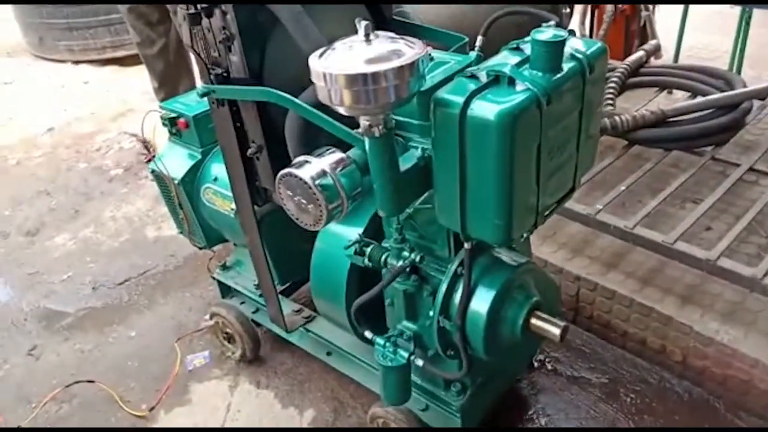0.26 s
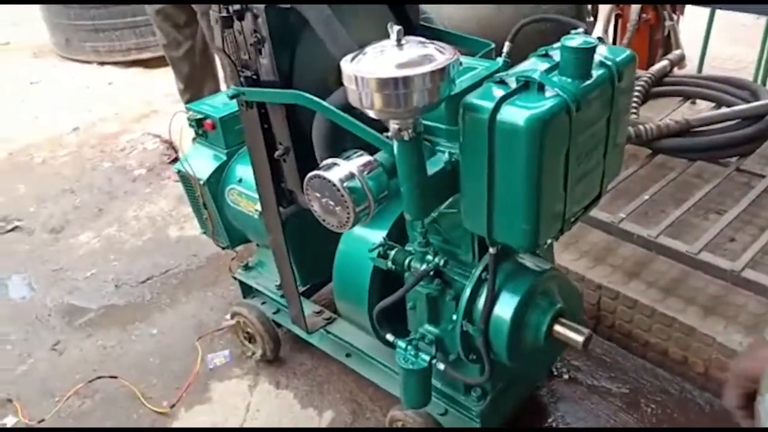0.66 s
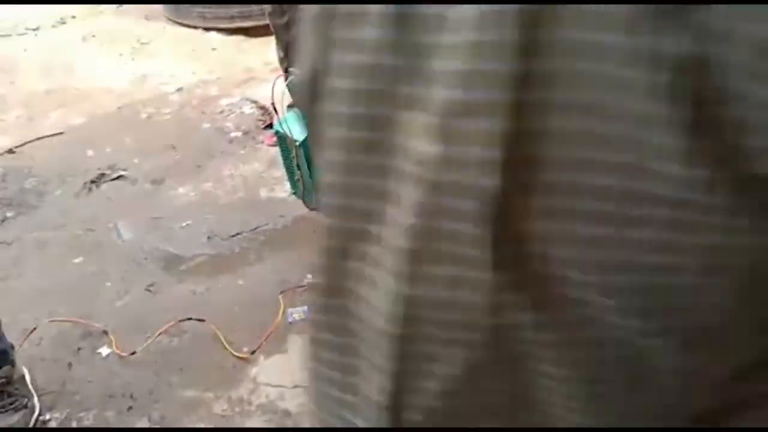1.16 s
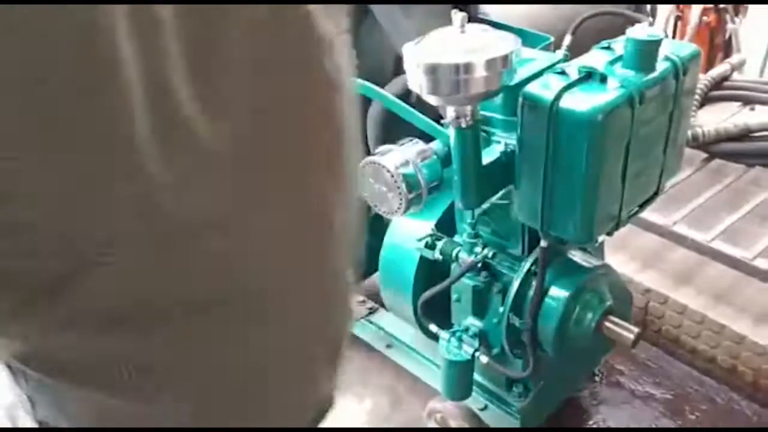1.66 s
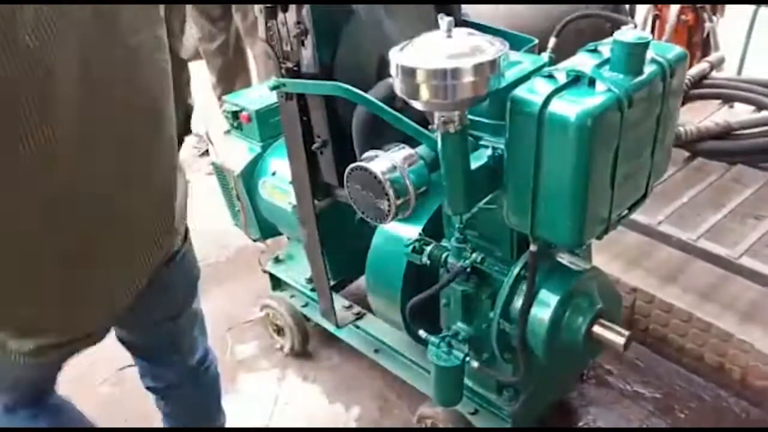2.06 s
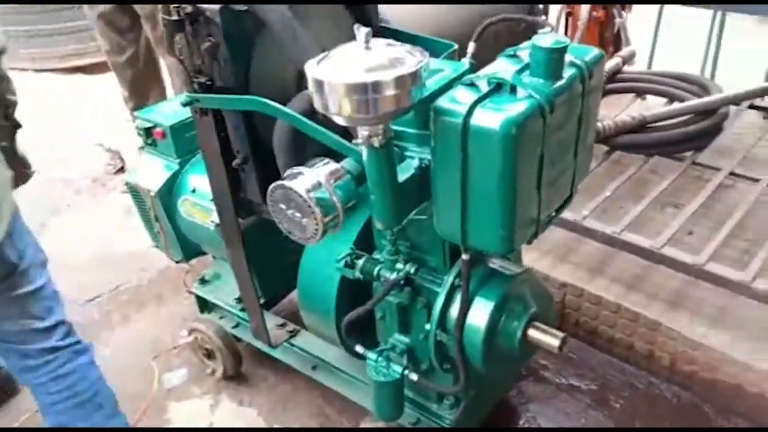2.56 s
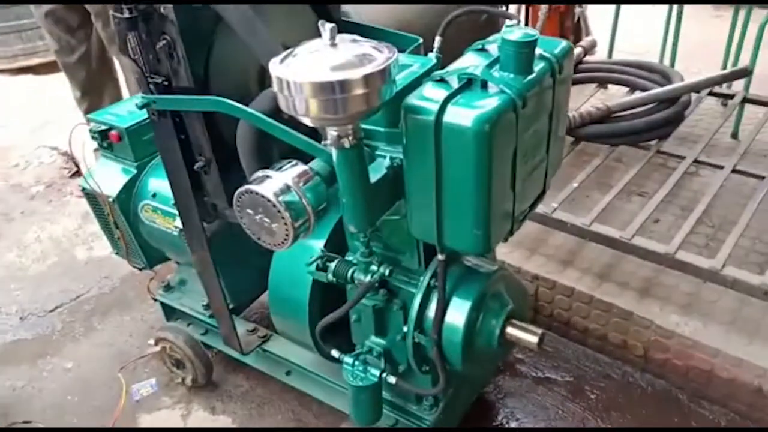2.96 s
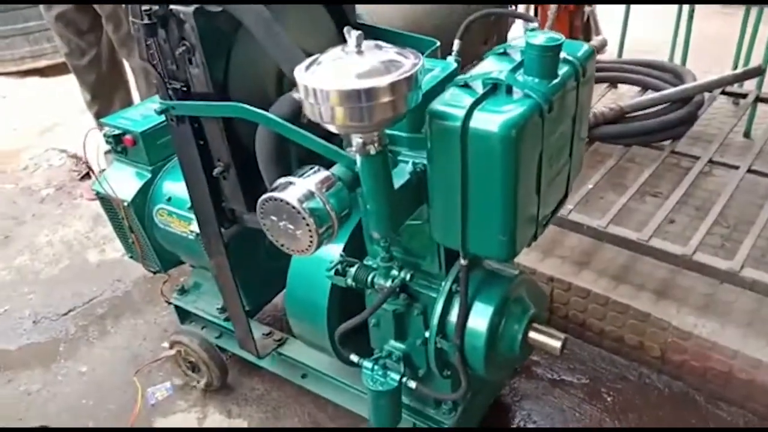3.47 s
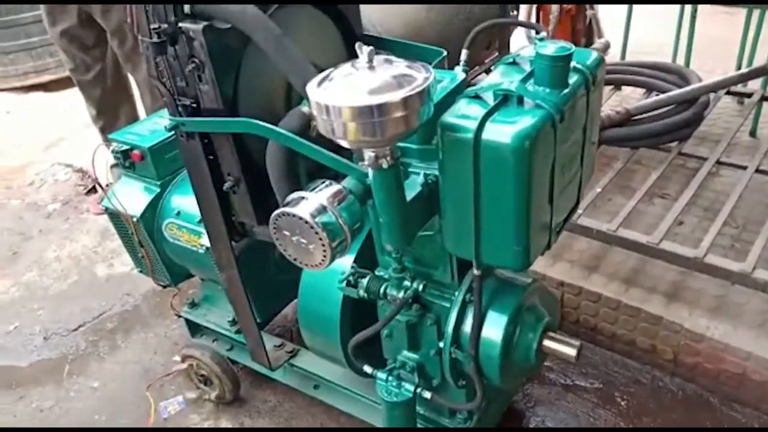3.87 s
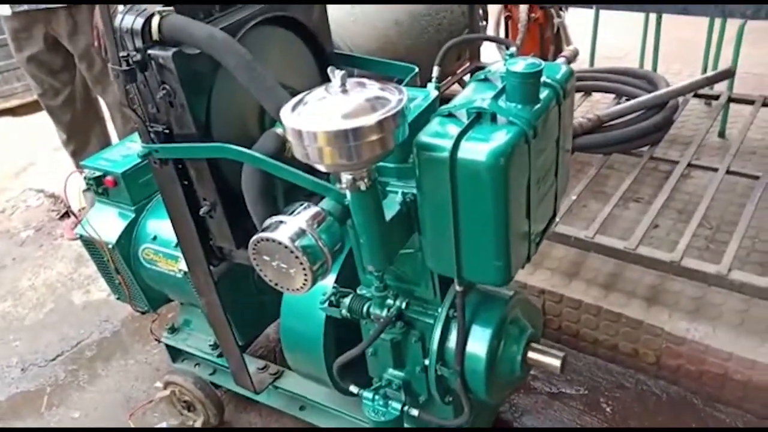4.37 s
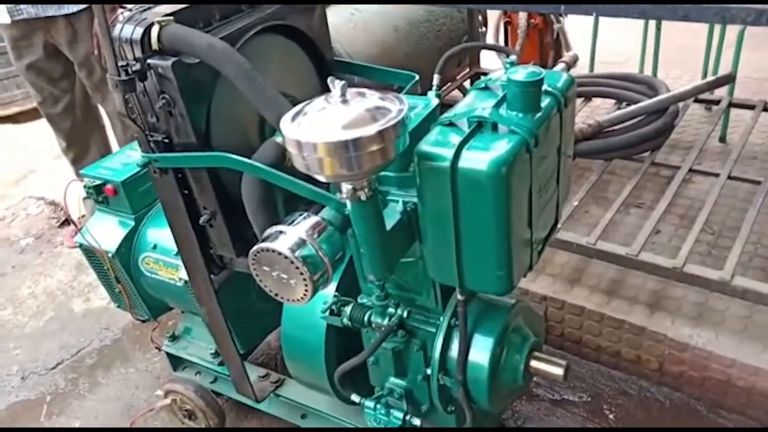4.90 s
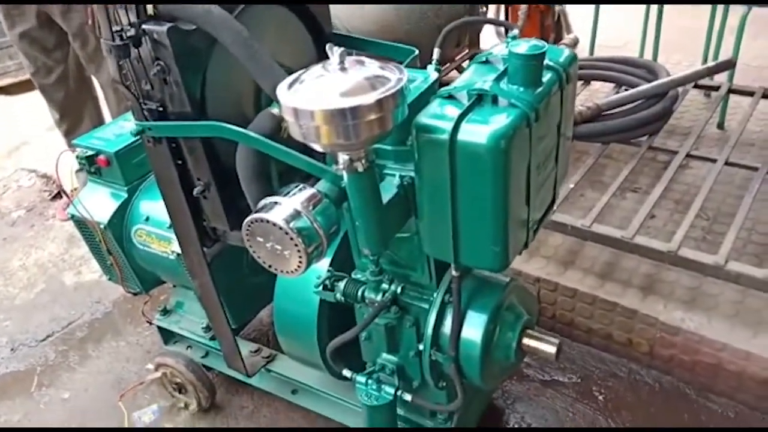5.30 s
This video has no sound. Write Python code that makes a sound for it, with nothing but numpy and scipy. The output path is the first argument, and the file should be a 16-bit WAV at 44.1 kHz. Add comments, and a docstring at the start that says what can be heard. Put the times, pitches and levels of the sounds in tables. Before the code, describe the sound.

Already running, a nearby diesel generator thuds and knocks about twelve times a second, with hissing exhaust blasts, a deep chug and rattling gears and tappets. After about half a second a passing body shields the microphone and softens the treble, most strongly just past one second. The full, bright clatter returns around two and a half seconds and carries on steadily, with brief reflections from an outdoor workshop yard.

```python
"""A single-cylinder four-stroke diesel turns a generator at about 1500 rpm in a workshop yard.
Each cycle, combustion knocks the block into resonance, the exhaust releases a turbulent blast,
and a deep gulp sets the air cleaner ringing; gears, tappets and bearings chatter throughout.
The governor hunts a little: the knock follows the fuel, the gulp follows the speed.
A man walking between engine and microphone shadows the treble; the yard returns a short tail."""
import sys
import numpy as np
from scipy import signal
from scipy.fft import rfft, irfft
from scipy.io import wavfile
from scipy.ndimage import uniform_filter1d, minimum_filter1d, map_coordinates

SR = 44100
rng = np.random.default_rng(int(sys.argv[2]) if len(sys.argv) > 2 else 0)


def dump(signal):
    """Clip the signal to [-1, 1] and save it as 16-bit WAV at the path in sys.argv[1]."""
    limited = np.clip(np.atleast_2d(signal).T, -1, 1)
    pcm = np.round(limited * 32767).astype(np.int16)
    wavfile.write(sys.argv[1], SR, pcm)


N = 244314

# Engine speed as the governor hunts, then settles: (time [s], firing rate [Hz])
FIRING_RATE = [(0.0, 12.359), (0.43, 12.831), (0.88, 12.521), (1.34, 12.876), (1.99, 13.04), (2.55, 12.406),
               (2.95, 12.29), (3.39, 12.718), (3.91, 12.421), (4.96, 12.533), (5.54, 12.497)]
# Piston slap and bearing knocks after ignition: (delay [s], level [dB])
IMPACTS = [(.0015, 1.5), (.005, -6), (.0084, -4.5)]
# Modes of block, flywheel and tank: (frequency [Hz], bandwidth [Hz], level over the spectrum [dB])
BLOCK_MODES = [(626, 100, 7), (858, 110, 6.5), (1028, 90, 5), (1624, 120, 4), (1792, 110, 2.5),
               (1954, 100, 4), (2116, 80, 3), (2250, 70, 11)]
# Broad response of the block: (frequency [Hz], level [dB])
BLOCK_SPECTRUM = [(60, -30.5), (150, -14.5), (240, -6), (330, -15), (520, -8.5), (750, -4), (1300, -9),
                  (1600, -2.5), (2300, -0.5), (2700, -10), (4000, -17.5), (5500, -41.5), (8500, -39.5),
                  (15000, -53)]
# Exhaust turbulence, as mid roar, high hiss and low buffet: (frequency [Hz], level [dB])
ROAR_SPECTRUM = [(40, -53.5), (110, 1), (300, 0.5), (750, 0.5), (1300, -1), (2200, 1), (2800, -1.5),
                 (3900, -3.5), (5000, -14.5), (6200, -29), (9000, -46)]
HISS_SPECTRUM = [(2000, -21), (5000, -1.5), (6400, -6), (7500, -3), (8900, 3), (10500, -7), (12200, 1),
                 (13000, -4.5), (14000, 2.5), (15600, 0)]
BUFFET_SPECTRUM = [(25, -49), (60, -9.5), (130, 0), (220, -5), (400, -3.5), (900, -36.5)]
# Exhaust blasts that roar harder or softer than the rest: (time [s], level change [dB])
BLAST_ACCENTS = [(.13, -0.5), (.37, 1.5), (2.89, 2.5), (2.97, 0.5)]
# Modes of air cleaner and frame: (frequency [Hz], level [dB], 60 dB decay time [s])
INTAKE_MODES = [(76.3, -24, 0.87), (162.4, -0.5, 0.38), (187.2, 5.5, 0.19), (215.6, 19, 0.039),
                (280.2, 4, 0.13), (357.2, -1, 0.13), (412.4, 7.5, 0.059), (524, -44, 0.042),
                (632.3, -1.5, 0.15), (797, 4.5, 0.075)]
# Chatter of gears, tappets and bearings: (frequency [Hz], level [dB])
CLATTER_SPECTRUM = [(25, -6), (60, 3), (200, -20), (400, 8.5), (550, -2.5), (780, -11), (1050, 3),
                    (2200, 9), (3000, 2), (4100, 2.5), (5500, -20.5), (8000, -13), (10500, -37),
                    (15000, -26)]
# Legs crossing before the microphone: (time [s], half duration [s], share of the full shadow [0-1])
LEG_CROSSINGS = [(1.087, .1, 1), (1.407, 0.205, 0.62)]
# Reverberation of the yard: (frequency [Hz], 60 dB decay time [s])
YARD_DECAY = [(100, 0.52), (500, 0.86), (2000, 0.55), (5000, 0.24), (15000, 0.28)]

FIRE_PHASE, EXHAUST_PHASE, INTAKE_PHASE = .372, .608, .914  # fractions of a cycle
LEAD = SR // 4  # the engine is already running at time zero
T = np.arange(-LEAD, N) / SR
FIRING_HZ = np.interp(T, *np.transpose(FIRING_RATE))
CYCLES = (np.cumsum(FIRING_HZ) - LEAD * FIRING_RATE[0][1]) / SR


def knock(db=-18, decay_s=.0035, tail_db=-13, tail_s=.02, ring_db=-26, ring_hz=850, ring_width_hz=75):
    """Impact excitation: each ignition hammers the modes of the block, harder with more fuel."""
    t = np.arange(2048) / SR
    envelope = sum(amp(level) * np.exp(-np.maximum(t - delay, 0) / decay_s)
                   * np.clip(t / delay, 0, 1) ** 3 for delay, level in IMPACTS)
    envelope += amp(tail_db) * np.exp(-t / tail_s)
    firings = strokes(FIRE_PHASE, jitter_s=.0004, spread_db=1)
    # the contact pattern changes slowly as the microphone moves, and partly anew at every firing
    angle = np.pi * (.3 * T + rng.random())
    pattern = sum(weight * unit_rms(convolve(firings, rattle(envelope)))
                  for weight in (1, np.cos(angle), np.sin(angle)))
    blows = unit_rms(pattern) + .6 * unit_rms(convolve(firings, envelope) * noise())
    block = amp(db) * colour(blows, BLOCK_SPECTRUM, BLOCK_MODES) * governor(speed_db=0, fuel_db=.5)
    low = signal.sosfiltfilt(signal.butter(4, 1350, fs=SR, output="sos"), block)
    shadow = shade(near_db=-4, leg_db=-3.5)
    shaded = low * shadow ** .51 + (block - low) * shadow  # long waves bend round the man
    # one mode of the block stands out while he is in front
    resonator = signal.iirpeak(ring_hz, ring_hz / ring_width_hz, SR)
    ring = unit_rms(signal.lfilter(*resonator, signal.lfilter(*resonator, blows)))
    return shaded + amp(ring_db) * ring * bump(at_s=1.23, half_s=.38)


def rattle(envelope):
    """Brief impacts are broadband: random contacts under an envelope, with a flattened spectrum."""
    burst = rng.standard_normal(len(envelope)) * envelope
    for _ in range(3):
        spectrum = rfft(burst)
        band_rms = np.sqrt(uniform_filter1d(abs(spectrum) ** 2, size=11))
        burst = irfft(spectrum / band_rms, len(envelope))
        local_rms = np.sqrt(abs(uniform_filter1d(burst ** 2, size=45)) + 1e-12)
        burst = np.tanh(burst / local_rms) * envelope
    return burst


def exhaust(roar_db=-22, hiss_db=-33.5, buffet_db=-33, pulse_db=-14):
    """Blowdown: gas escaping through the valve radiates a pressure pulse and turbulent noise."""
    roar = amp(roar_db) * jet(ROAR_SPECTRUM, decay_s=.014, spread_db=.1)
    roar *= shade(near_db=-2.5, leg_db=-6.5) * governor(speed_db=-3, fuel_db=.8)
    roar *= amp(sum(change_db * bump(at_s, half_s=.04) for at_s, change_db in BLAST_ACCENTS))
    hiss = amp(hiss_db) * jet(HISS_SPECTRUM, decay_s=.032, spread_db=.45)
    hiss *= shade(near_db=-1.85, leg_db=-5)
    buffet = amp(buffet_db) * jet(BUFFET_SPECTRUM, decay_s=.0027, spread_db=4.5)
    buffet *= shade(near_db=-19.5, leg_db=-12)
    pulse = -amp(pulse_db) * pressure_pulse(strokes(EXHAUST_PHASE, spread_db=.1), hz=240, half_s=.0015)
    return diffract(roar + hiss) + buffet + pulse


def jet(spectrum, decay_s, spread_db, rise_s=.0015, open_s=.026, close_s=.002):
    """Turbulence: noise starts as the exhaust valve opens and decays until the valve cuts it off."""
    t = np.arange(SR // 16) / SR
    valve = np.clip(t / rise_s, 0, 1) / (1 + np.exp((t - open_s) / close_s))
    flow = convolve(strokes(EXHAUST_PHASE, spread_db=spread_db), valve * np.exp(-t / decay_s))
    return colour(flow * noise(), spectrum)


def intake(gulp_db=-7, edge_db=-16.5, ring_db=-24, ring_rise_s=.0056):
    """Free vibration: air cleaner and frame ring on after each hollow gulp of the piston."""
    gulps = strokes(INTAKE_PHASE)
    t = np.arange(SR // 4) / SR
    modes = sum(amp(level - 60 * t / t60) * np.sin(2 * np.pi * hz * t) for hz, level, t60 in INTAKE_MODES)
    onset = 1 - np.exp(-(t / ring_rise_s) ** 2)
    ring = amp(ring_db) * convolve(gulps, modes * onset)
    gulp = amp(gulp_db) * pressure_pulse(gulps, hz=272, half_s=.0032)
    edge = amp(edge_db) * pressure_pulse(gulps, hz=461, half_s=.0025) * shade(near_db=2, leg_db=.5)
    return (gulp + edge + ring) * governor(speed_db=3, fuel_db=-.64) * shade(near_db=.5, leg_db=-2)


def chug(db=-28):
    """Acoustic low-pass: the silencer lets each charge of gas out as one slow, deep swing."""
    charges = strokes(EXHAUST_PHASE, spread_db=.9)
    return amp(db) * pressure_pulse(charges, hz=84, half_s=.018) * shade(near_db=1, leg_db=1)


def clatter(db=-30.5, surge_s=.0063, grain_db=.5):
    """Contact noise: gears, tappets and bearings chatter steadily, surging at each intake stroke."""
    t = np.arange(SR // 12) / SR
    surge = 1 + convolve(strokes(INTAKE_PHASE), np.exp(-t / surge_s))
    grain = amp(grain_db * unit_rms(uniform_filter1d(noise(), size=60)))
    return amp(db) * colour(noise() * surge * grain, CLATTER_SPECTRUM) * shade(near_db=1.2, leg_db=-2)


def strokes(phase, jitter_s=0., spread_db=0.):
    """Periodic excitation: one impulse a cycle at the given phase, scattered in time and level."""
    onsets = np.flatnonzero(np.diff(np.floor(CYCLES - phase)) > 0)
    lateness, strength = rng.standard_normal((len(onsets), 2)).T
    onsets += np.round(lateness * jitter_s * SR).astype(int)
    train = np.zeros(len(T))
    train[np.clip(onsets, 0, len(T) - 1)] = amp(spread_db * strength)
    return train


def pressure_pulse(train, hz, half_s):
    """Rarefaction, then compression: a Gaussian-windowed sine centred on each impulse."""
    t = np.arange(-SR // 100, SR // 100 + 1) / SR
    return signal.oaconvolve(train, np.sin(2 * np.pi * hz * t) * np.exp(-(t / half_s) ** 2), "same")


def governor(speed_db, fuel_db, rated_hz=12.5):
    """Amplitude modulation: dB per Hz of excess firing rate, and per Hz/s as fuel speeds the engine."""
    acceleration = uniform_filter1d(np.gradient(FIRING_HZ) * SR, size=SR // 4)
    return amp(speed_db * (FIRING_HZ - rated_hz) + fuel_db * acceleration)


def shade(near_db, leg_db, from_s=.53, until_s=2.57, edge_s=.088):
    """Acoustic shadow: the level shifts by near_db while the man is close, plus leg_db behind a leg."""
    near = (np.tanh((T - from_s) / edge_s) - np.tanh((T - until_s) / edge_s)) / 2
    return amp(near_db * near + leg_db * leg_cover())


def leg_cover():
    """Occlusion: how far the legs hide the microphone, from 0 to about 1."""
    return sum(share * bump(at_s, half_s) for at_s, half_s, share in LEG_CROSSINGS)


def diffract(x, detour_s=.00294):
    """Diffraction: sound that bends round a leg travels farther and arrives late."""
    return map_coordinates(x, [np.arange(len(T)) - detour_s * SR * leg_cover()], order=3)


def yard(x, wet_db=-7, onset_s=.0023):
    """Reverberation: sparse reflections off floor, walls and machines; each band has its own decay."""
    reflections = rng.choice([-1., 1.], SR // 2) * (rng.random(SR // 2) < .1)
    hz, t, bands = signal.stft(reflections, SR, nperseg=256)
    decay = amp(-60 * t / curve_at(YARD_DECAY, hz)[:, None])
    onset = np.clip(t / onset_s, 0, 1) ** 2
    tail = signal.istft(bands * decay * onset, SR, nperseg=256)[1]
    return amp(wet_db) * convolve(x, tail / np.linalg.norm(tail))


def colour(x, spectrum, modes=()):
    """Minimum-phase filtering: a broad spectrum with resonance peaks on it; the output has rms 1."""
    freqs = np.fft.rfftfreq(8192, 1 / SR)
    power = 1 + sum(amp(db) ** 2 / (1 + (2 * (freqs - hz) / width) ** 2) for hz, width, db in modes)
    log_gain = np.log(amp(curve_at(spectrum, freqs)) * np.sqrt(power))
    mirrored = np.r_[log_gain, log_gain[-2:0:-1]]
    response = np.fft.ifft(np.exp(signal.hilbert(mirrored).conj())).real[:len(freqs)]
    return unit_rms(convolve(x, response))


def convolve(x, response):
    """Convolution with an impulse response, cut to the length of x."""
    return signal.oaconvolve(x, response)[:len(x)]


def curve_at(points, hz):
    """Interpolation of (frequency [Hz], value) points on a log-frequency axis."""
    freqs, values = np.transpose(points)
    return np.interp(np.log(hz + 1), np.log(freqs), values)


def bump(at_s, half_s):
    """Gaussian window of height 1."""
    return np.exp(-((T - at_s) / half_s) ** 2)


def noise():
    """White noise over the whole run."""
    return rng.standard_normal(len(T))


def amp(db):
    """Amplitude ratio of a level in decibels."""
    return 10 ** (np.asarray(db) / 20)


def unit_rms(x):
    """Normalisation to rms 1."""
    return x / np.sqrt(np.mean(x ** 2) + 1e-20)


def scene():
    """Superposition in mono: the knock sounds drier than the exhaust, which echoes more in the yard."""
    block, gas = knock(), exhaust()
    echo = yard(gas + .45 * block)
    return (block + gas + echo + intake() + chug() + clatter())[None, LEAD:]


def record(dry, low_cut_hz=42, ceiling=.86, high_cut_hz=15620):
    """Band and peak limiting: a small microphone drops the lowest bass; a limiter and low-pass follow."""
    heard = signal.sosfilt(signal.butter(2, low_cut_hz, "highpass", fs=SR, output="sos"), dry)
    safe_gain = np.minimum(1, ceiling / (abs(heard) + 1e-9))
    limited = heard * uniform_filter1d(minimum_filter1d(safe_gain, size=131), size=131)
    low_pass = signal.firwin(401, high_cut_hz, window=("kaiser", 9), fs=SR)
    return signal.oaconvolve(limited, low_pass[None], "same")


dry = scene()
out = record(dry)
dump(out)
```